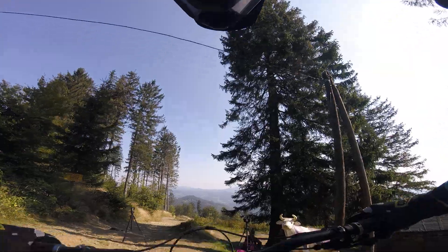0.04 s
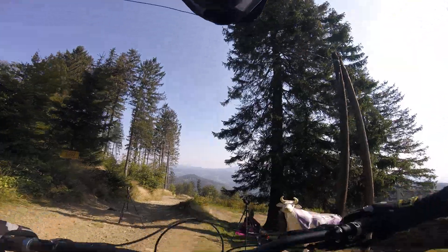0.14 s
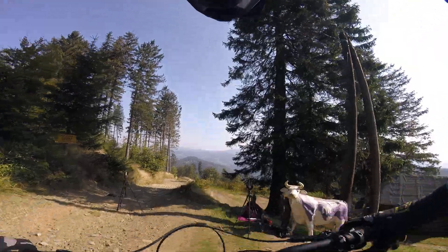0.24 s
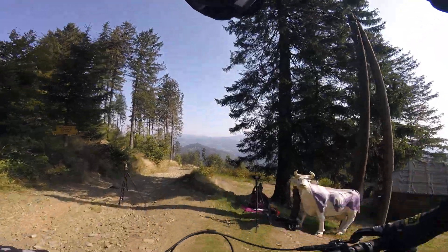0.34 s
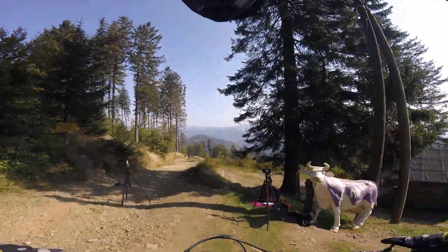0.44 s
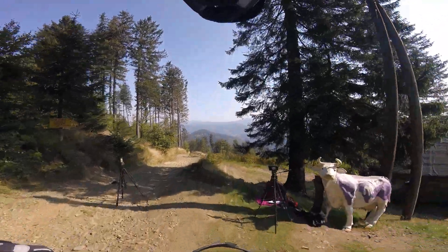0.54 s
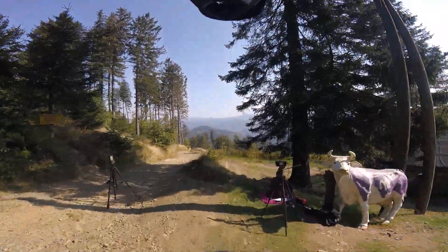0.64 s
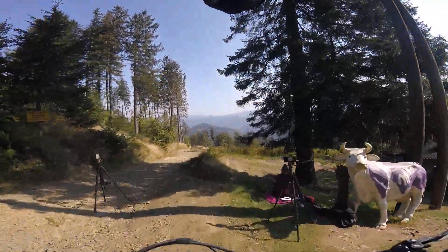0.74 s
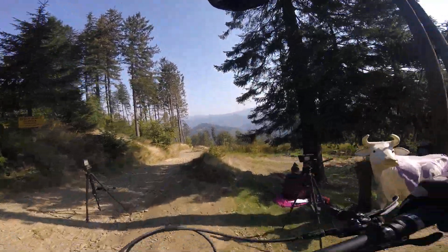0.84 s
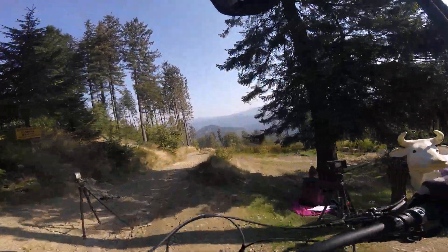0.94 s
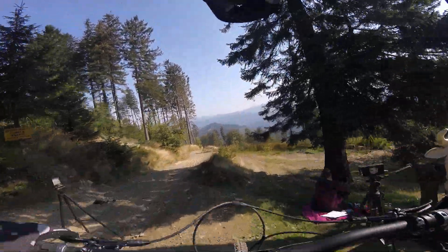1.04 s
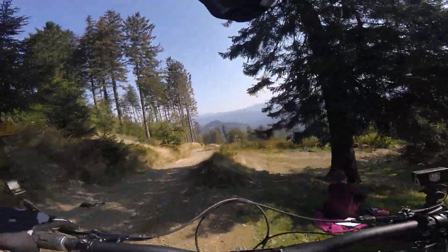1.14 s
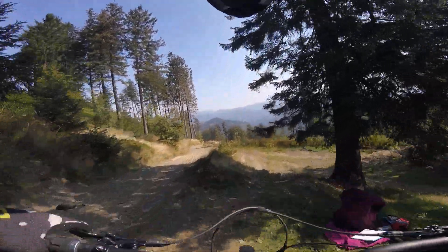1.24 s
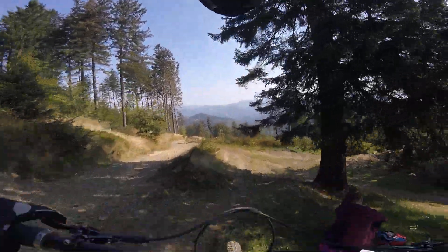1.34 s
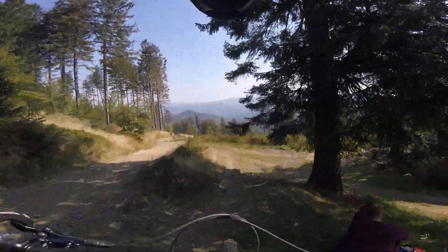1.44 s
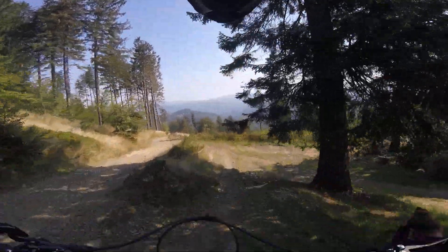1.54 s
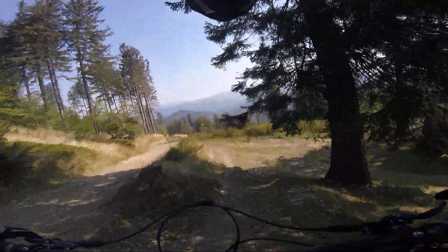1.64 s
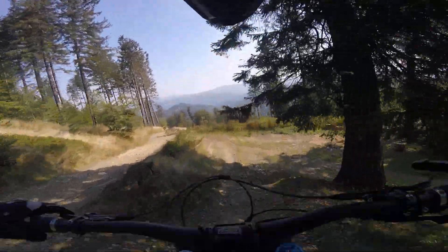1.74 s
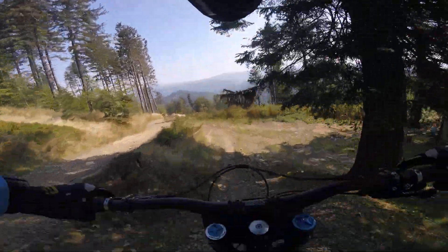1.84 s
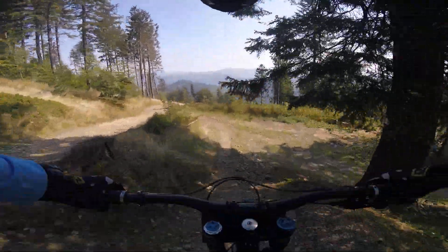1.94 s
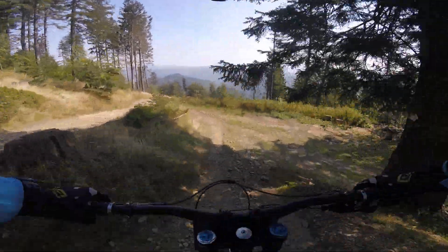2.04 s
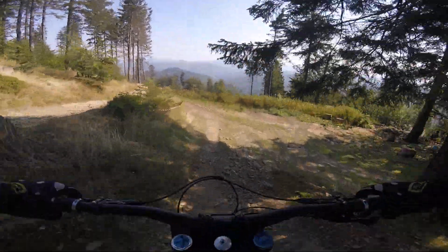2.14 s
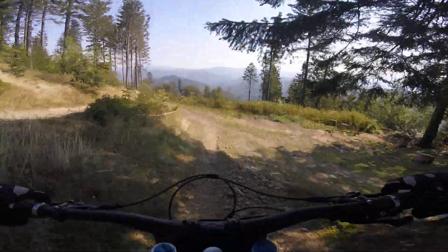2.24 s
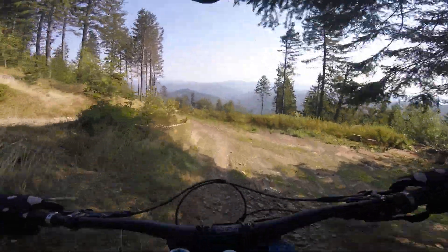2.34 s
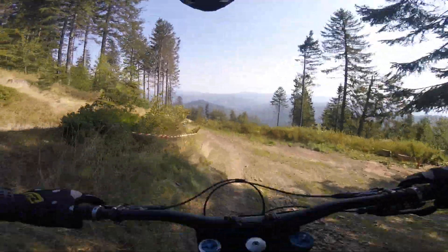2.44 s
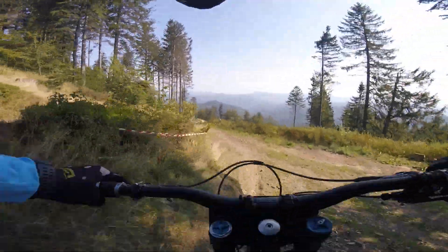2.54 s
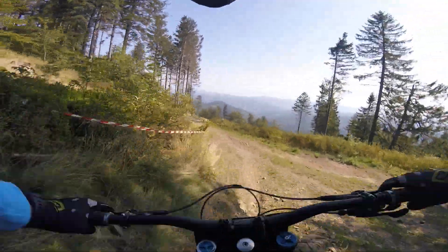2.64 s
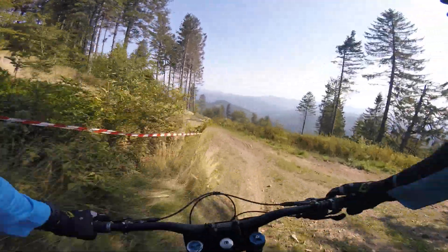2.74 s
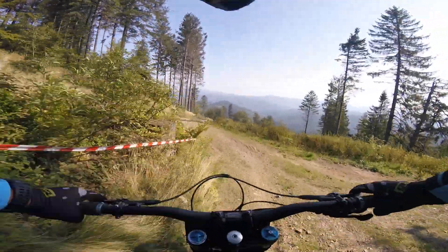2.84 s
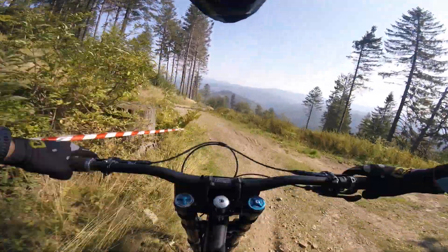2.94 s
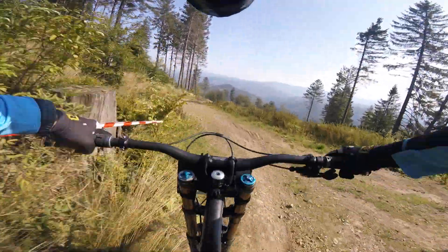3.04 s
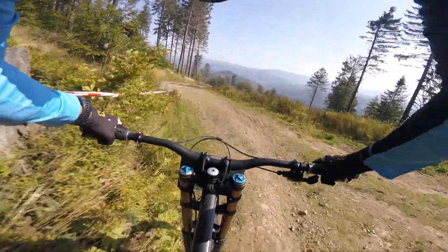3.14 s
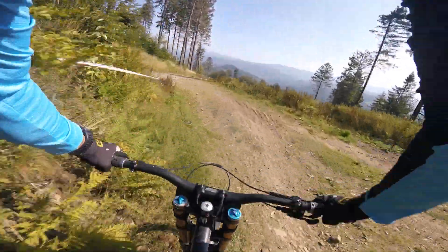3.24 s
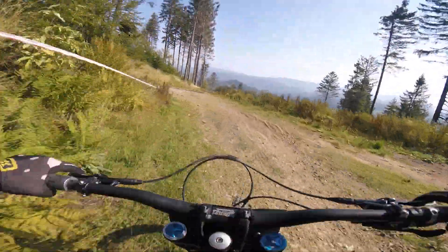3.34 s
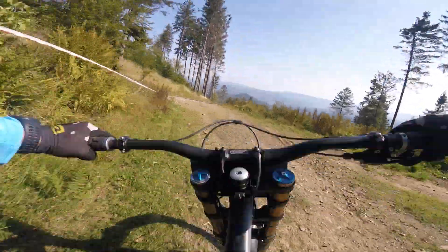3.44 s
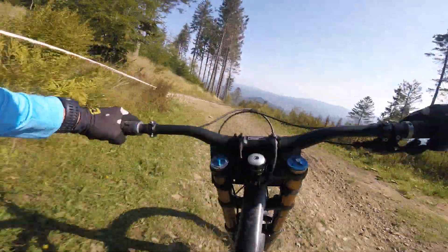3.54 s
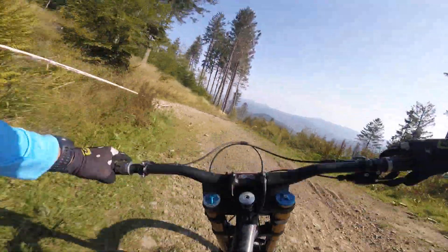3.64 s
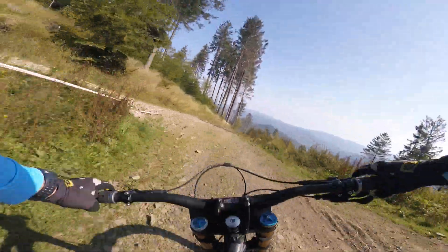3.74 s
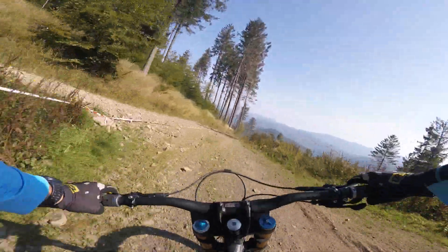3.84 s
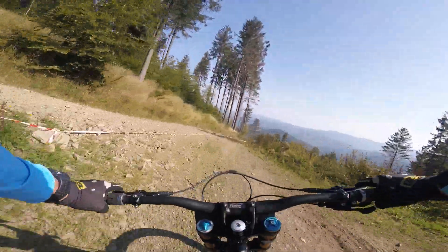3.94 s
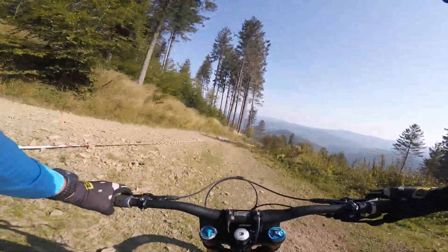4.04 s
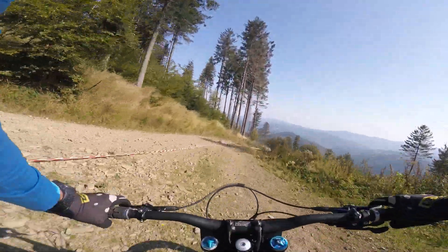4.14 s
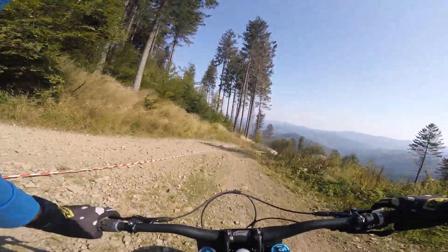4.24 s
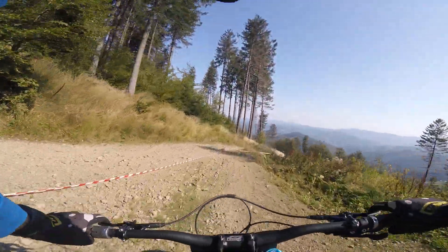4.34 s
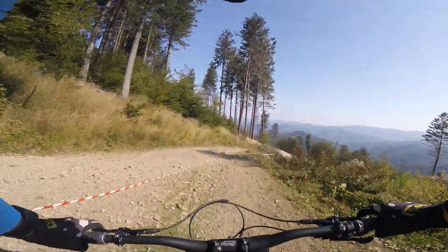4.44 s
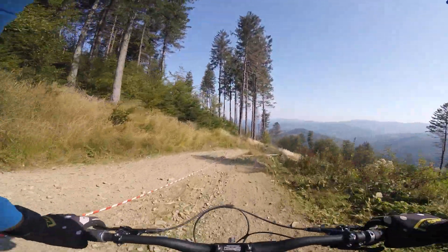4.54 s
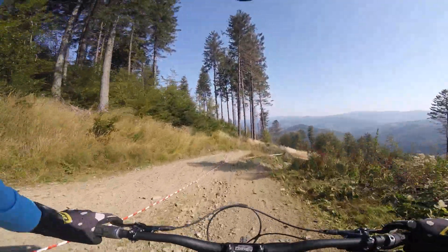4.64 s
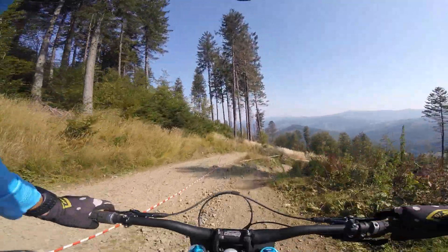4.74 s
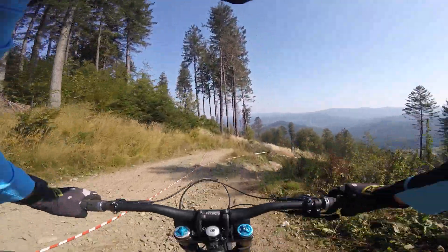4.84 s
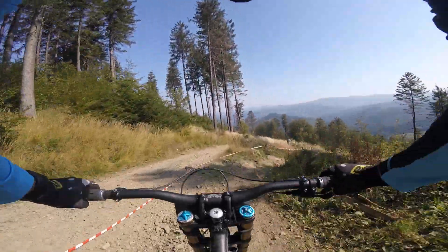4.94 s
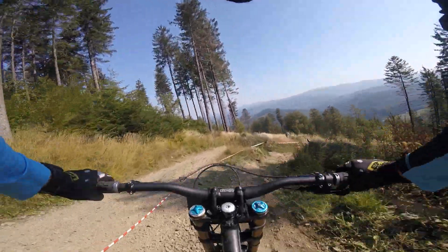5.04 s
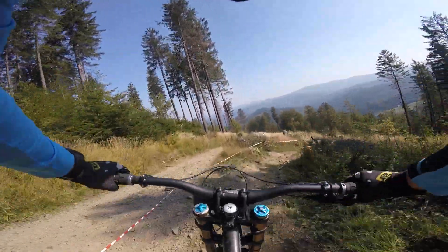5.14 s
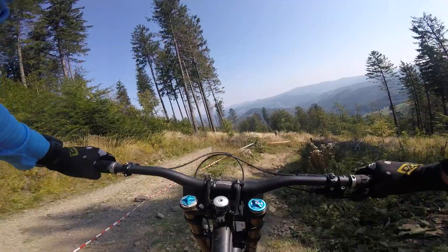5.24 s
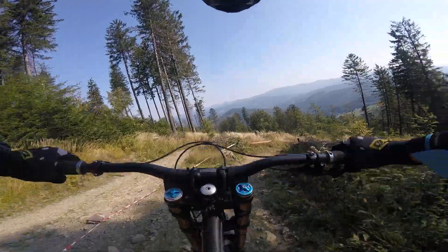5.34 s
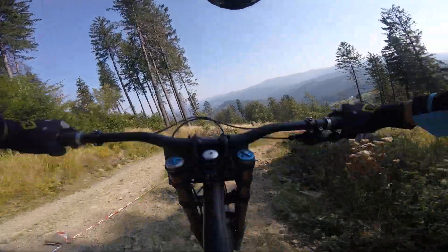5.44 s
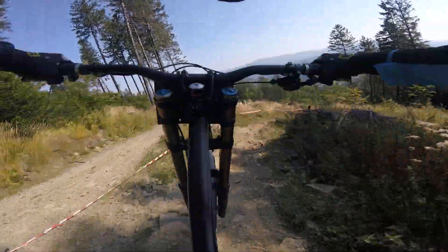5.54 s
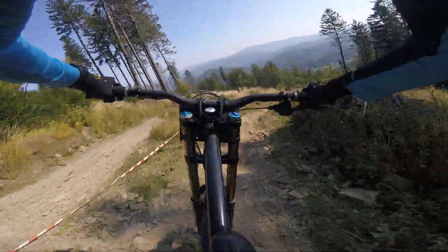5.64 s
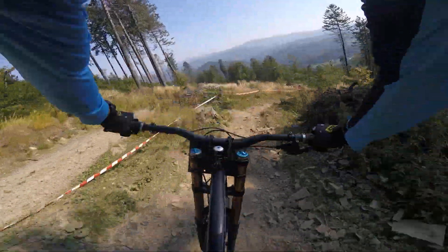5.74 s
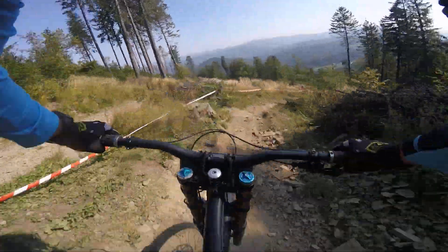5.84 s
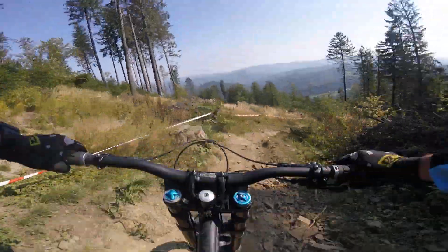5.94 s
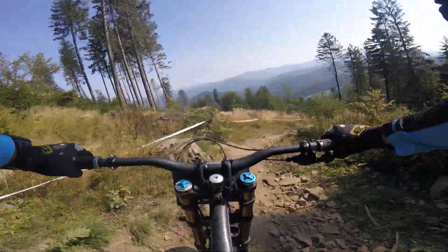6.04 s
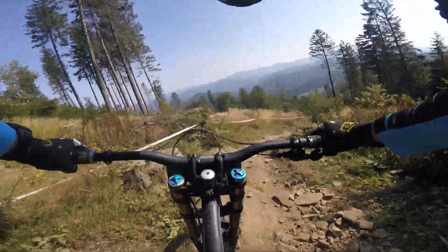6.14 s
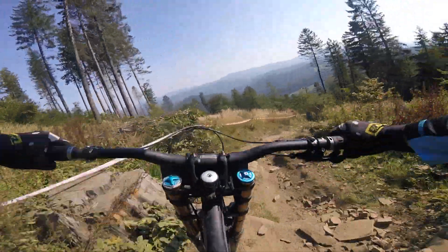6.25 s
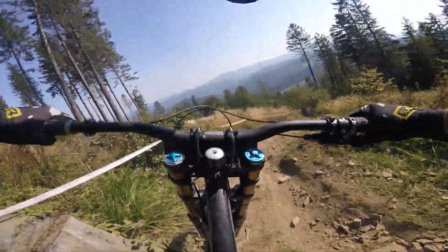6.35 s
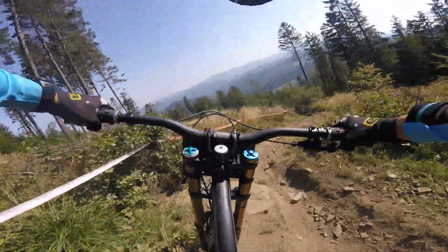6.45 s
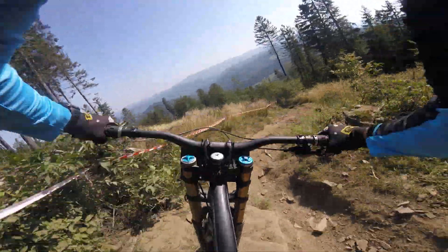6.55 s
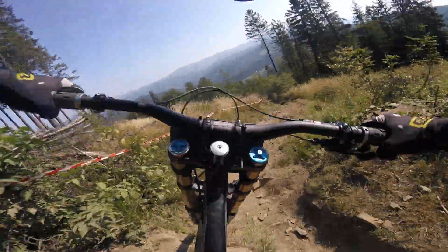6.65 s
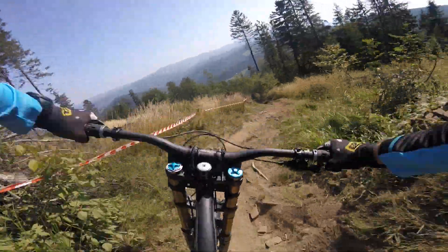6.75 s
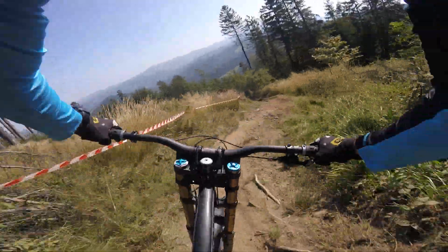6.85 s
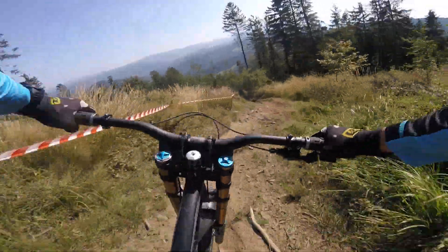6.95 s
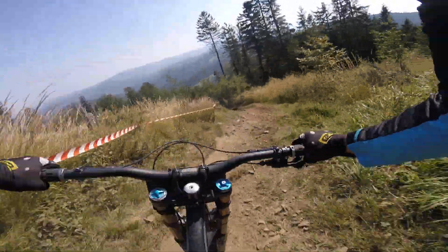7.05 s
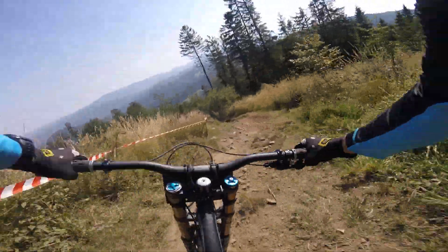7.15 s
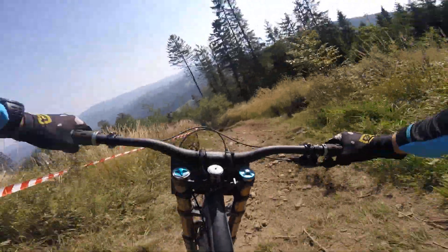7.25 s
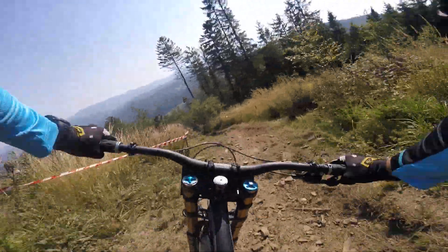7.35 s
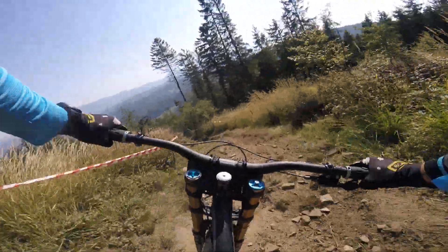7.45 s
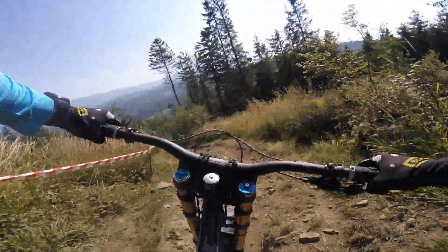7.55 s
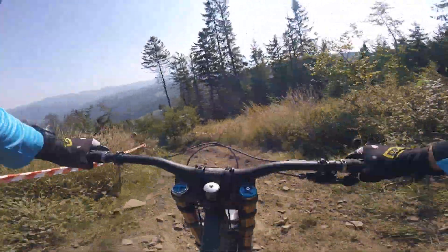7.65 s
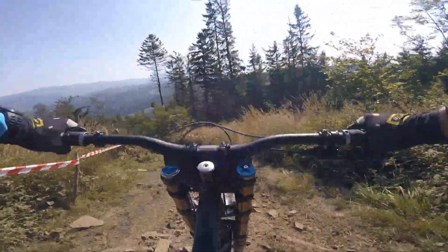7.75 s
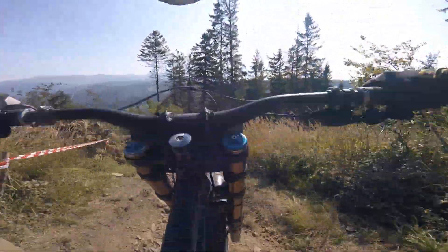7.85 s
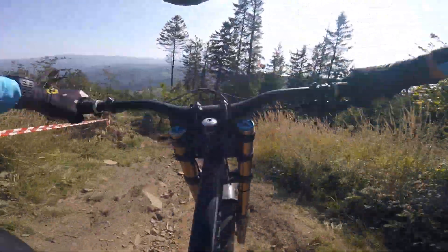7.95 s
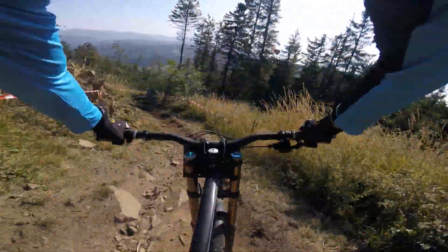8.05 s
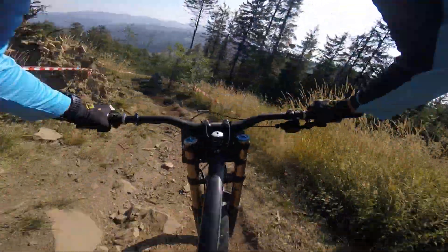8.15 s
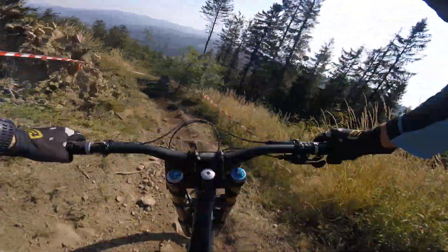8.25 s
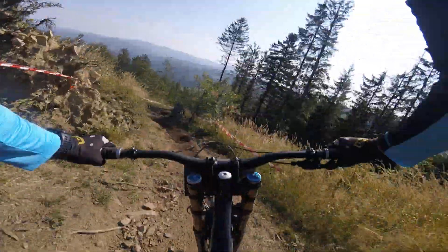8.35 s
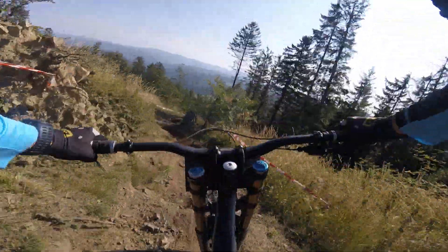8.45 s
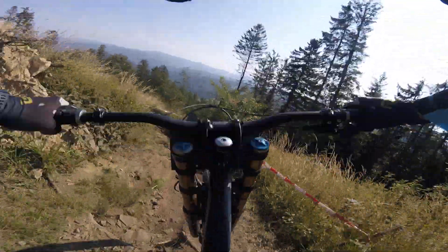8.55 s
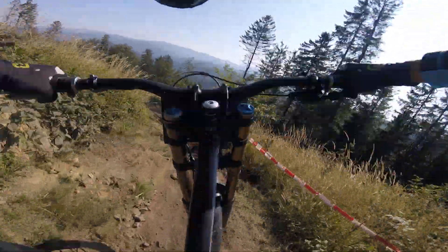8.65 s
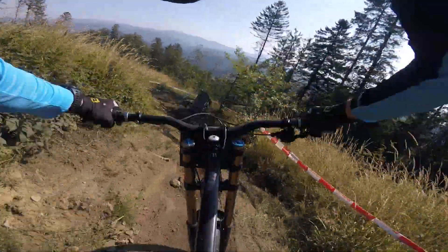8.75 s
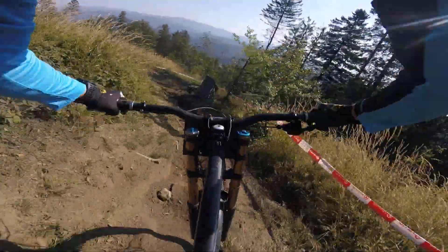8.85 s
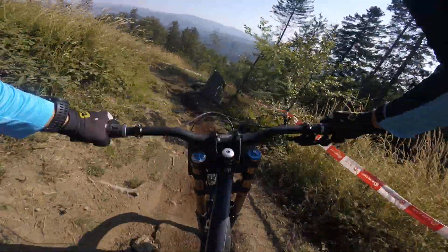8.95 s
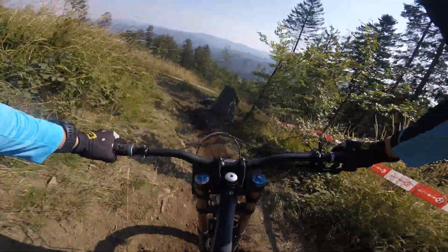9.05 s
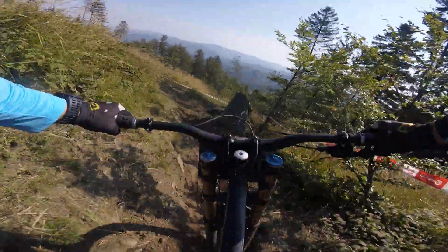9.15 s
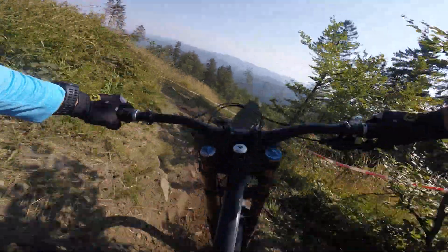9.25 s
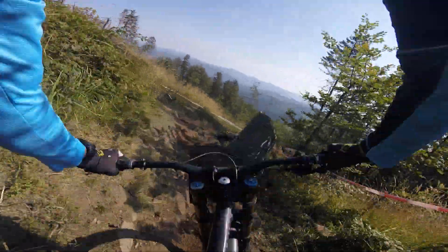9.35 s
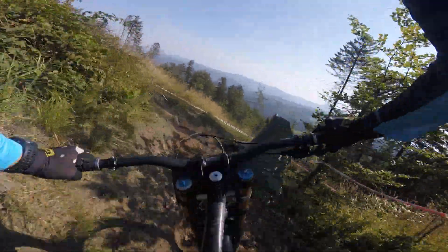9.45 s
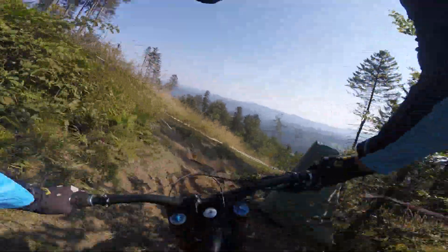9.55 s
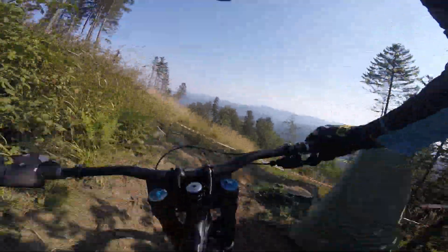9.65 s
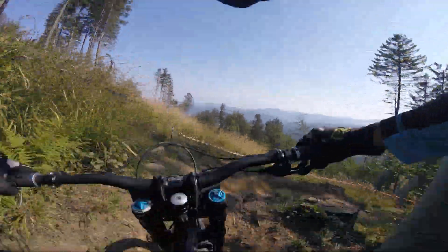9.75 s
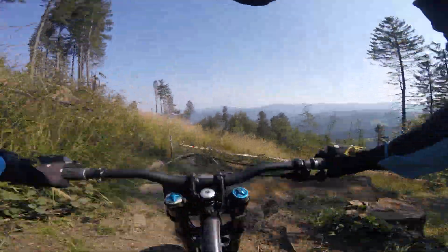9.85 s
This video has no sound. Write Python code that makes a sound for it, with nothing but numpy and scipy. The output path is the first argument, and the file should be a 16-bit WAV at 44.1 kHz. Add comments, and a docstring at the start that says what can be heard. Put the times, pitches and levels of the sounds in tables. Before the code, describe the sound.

A mountain bike sets off on an open hillside, heard close from the rider's chest. From 0 to 0.7 s there are only soft low wind puffs, faint rolling and a hush of air. Around 0.75 s the chain begins to tick; bright hard slaps at 1.02, 1.16 and 1.5 s leave a faint high metallic ringing. From 2 s the tyres crunch over rough patches, with dull jolts and chain slaps thickening to 2.85 s. At 3.1 s comes a heavy thump, the rolling drops out briefly, and another thump lands at 3.25 s. Gravel crunch and smooth hiss follow with fewer knocks, the hiss fading by 5.8 s. A sharp clatter hits at 5.4 s. From 5.8 s to the end, deep wind buffeting dominates, over irregular stone clatter, frame knocks, chain slaps, pebble pings and an intermittent thin wavering brake squeal.

```python
"""A mountain bike rolls off and speeds down a stony trail, heard by a camera on the rider's chest.
First come separate wind puffs (windowed swings) and soft rolling (coloured noise and grit snaps). Then the
chain slaps (rung modes), a few early slaps leave metal singing (narrow noise), frame and pebbles ring.
From 2 s rough patches clatter; near 3.1 s the tyres drop out as the wheels leave the ground, amid hard jolts
(sinking sines). Gravel hiss comes and fades by 5.8 s, while the slow wind buffeting grows; from 6.1 s a brake
sings at times. Air hushes throughout."""
import sys
import numpy as np
from scipy import signal
from scipy.fft import rfft, irfft, next_fast_len
from scipy.io import wavfile
from scipy.ndimage import uniform_filter1d

SR = 44100
rng = np.random.default_rng(int(sys.argv[2]) if len(sys.argv) > 2 else 0)


def transcribe(signal):
    """Save signal, clipped to [-1, 1], as a 16-bit WAV file at the path in sys.argv[1]."""
    frames = np.atleast_2d(signal).T
    limited = np.clip(frames, -1, 1)
    pcm = np.round(limited * 32767).astype(np.int16)
    wavfile.write(sys.argv[1], SR, pcm)


N = 436590


def gain_of(db):
    """Decibels to amplitude."""
    return 10 ** (np.asarray(db) / 20)


def evened(x):
    """Scales to rms 1."""
    return x / np.sqrt(np.mean(x ** 2) + 1e-20)


def follow(rows):
    """Interpolates each column of a time curve at every sample."""
    at_s, *columns = np.transpose(rows)
    t = np.arange(N) / SR
    return [np.interp(t, at_s, column) for column in columns]


def add(mix, start_s, sound):
    """Mixes a sound in at start_s, cut at the end of the mix."""
    part = mix[round(start_s * SR):][:len(sound)]
    part += sound[:len(part)]


def coloured(x, points):
    """Shapes the spectrum of x by (hz, db) points over log frequency, at rms 1."""
    point_hz, point_db = np.transpose(points)
    size = next_fast_len(N)
    hz = np.fft.rfftfreq(size, 1 / SR)
    shape_db = np.interp(np.log(hz + 1), np.log(point_hz + 1), point_db, -90, -90)
    return evened(irfft(rfft(x, size) * gain_of(shape_db), size)[:N])


def lumps(length_s):
    """Random wander of rms 1 whose lumps last about length_s."""
    width = max(round(length_s * SR), 2)
    smoothed = uniform_filter1d(rng.standard_normal(N), width)
    return evened(uniform_filter1d(smoothed, width))


def blotched(x, depth_db):
    """Colours x with random patches a few hundred Hz wide and some tens of ms long, at rms 1."""
    spectra = signal.stft(x, nperseg=512, noverlap=384)[2]
    patches = rng.standard_normal(spectra.T.shape)
    patches = uniform_filter1d(patches, size=9, axis=0)  # over time
    patches = uniform_filter1d(patches, size=3, axis=1)  # over frequency
    spectra = spectra * gain_of(depth_db * evened(patches.T))
    return evened(signal.istft(spectra, nperseg=512, noverlap=384)[1][:N])


def burst(level_db, hz, t60_s, width, rise_s, noise):
    """A short puff of noise from hz / width to hz * width with a quick rise and an even decay."""
    t = np.arange(len(noise)) / SR
    band = [hz / width, min(hz * width, .45 * SR)]
    shape = gain_of(-60 * t / t60_s) * np.minimum(t / rise_s, 1)
    puff = signal.sosfilt(signal.butter(2, band, "band", fs=SR, output="sos"), noise * shape)
    return gain_of(level_db) * puff / abs(puff).max()


def rung(modes, t, weights_db, phases):
    """Modes dying away after one blow, scaled to peak 1 before a quick rise."""
    ring = np.zeros(len(t))
    for (hz, level_db, t60_s), weight_db, phase in zip(modes, weights_db, phases):
        ring += gain_of(level_db + weight_db - 60 * t / t60_s) * np.sin(2 * np.pi * (hz * t + phase))
    return ring / abs(ring).max() * np.minimum(t / 0.00027, 1)


def grit(lo_hz, hi_hz, per_s, spread_db, count=16, ring=1):
    """Small stones snap, each a few cycles at one of count pitches; most are faint, a few large; rms 1."""
    size_db = spread_db * np.minimum(rng.exponential(1, N), 4)
    size = gain_of(size_db) * (rng.random(N) < per_s / SR)
    kind = rng.integers(0, count, N)
    out = np.zeros(N)
    for k, hz in enumerate(np.geomspace(lo_hz, hi_hz, count)):
        turns = np.arange(round(30 * SR / hz)) * hz / SR
        cycles = ring * rng.uniform(2.34, 3.44)
        snap = np.sin(2 * np.pi * turns) * turns * np.exp(-turns / cycles * 2)
        out += signal.oaconvolve(size * (kind == k), snap / np.linalg.norm(snap))[:N]
    return evened(out)


# steady rolling, dropping out while the wheels leave the ground: start_s, crunch_db, fizz_db
ROLL_LEVELS = [(0.0, -49.5, -58), (0.47, -54, -62), (1.0, -44.5, -57.5), (1.8, -41, -51),
               (2.151, -38.5, -50.5), (2.5, -31.5, -44), (2.8, -29, -40), (3.09, -39, -48.5),
               (3.105, -44, -70), (3.14, -46, -62), (3.17, -38, -50), (3.245, -36, -54), (3.26, -43, -65),
               (3.35, -37, -49), (3.7, -34.5, -49), (4.2, -35, -44), (4.62, -31, -43.5), (5.4, -28.5, -42),
               (5.8, -32, -45), (6.6, -33.5, -46.5), (8.1, -32, -46), (9.9, -34, -45)]
# swells at rough patches: peak_s, crunch_db, fizz_db
ROUGH_PATCHES = [(2.02, -36, -45), (2.076, -29.5, -40), (2.24, -33, -42), (2.425, -32, -42),
                 (2.75, -33, -53), (2.82, -28, -48), (2.97, -35, -40), (5.19, -31, -55), (5.27, -41, -57),
                 (5.35, -30, -54), (5.41, -22, -50), (5.46, -28, -53), (5.653, -25, -35.5),
                 (5.848, -24.5, -62), (5.96, -31, -39), (6.18, -29, -52), (6.38, -27, -39),
                 (6.53, -28.5, -40), (6.59, -46, -41), (6.692, -38, -58), (6.88, -32, -42),
                 (7.036, -26.5, -40), (7.19, -25.5, -44), (7.373, -23.5, -34.5), (7.462, -27, -38),
                 (7.545, -25.5, -40), (7.679, -24.5, -36), (7.831, -32, -37), (7.9, -31.5, -41),
                 (8.119, -27, -33.5), (8.27, -26.5, -55), (8.35, -47, -39), (8.53, -44, -59),
                 (8.6, -36, -41), (8.75, -30.5, -40), (8.812, -24.5, -44), (8.86, -38, -34),
                 (9.02, -27.5, -45), (9.151, -26, -34.5), (9.312, -24, -51), (9.38, -29, -40),
                 (9.52, -38, -57), (9.57, -28, -38), (9.77, -29.5, -55.5), (9.89, -49.5, -37.5)]
PATCH_RISE_S, PATCH_FALL_S = 0.024, 0.034  # time to swell by and to fall by 10 dB


def rolling():
    """Amplitudes of crunch and fizz, steady power plus patch swells; third, the crunch swells alone."""
    t = np.arange(0, N, 64) / SR
    at_s, *steady_db = np.transpose(ROLL_LEVELS)
    peak_s, *peak_db = np.transpose(ROUGH_PATCHES)
    late_s = t[:, None] - peak_s
    swell_db = -10 * np.where(late_s < 0, -late_s / PATCH_RISE_S, late_s / PATCH_FALL_S)
    swells = [(gain_of(db + swell_db) ** 2).sum(1) for db in peak_db]
    powers = [gain_of(np.interp(t, at_s, db)) ** 2 + swell for db, swell in zip(steady_db, swells)]
    powers.append(swells[0])
    return [np.interp(np.arange(N) / SR, t, np.sqrt(power)) for power in powers]


# how stony the ground is: start_s, share_0_to_1
STONINESS = [(0, 0.3), (.65, 0.33), (1.0, 0.8), (2.0, 0.86), (2.9, 0.62), (3.4, 0.6), (4.2, 0.47),
             (5.0, 0.57), (5.5, 0.93), (7.0, 0.66), (9.9, 0.82)]
# tyre spectra, crunch, fizz and low shudder of the bike: pitch_hz, level_db (per Hz)
CRUNCH_SPECTRUM = [(250, -26), (480, 3), (700, -6.5), (1050, 0.5), (1550, -3), (1950, 1), (2350, -2),
                   (2800, -8), (3200, -14), (3600, -14), (5000, -23)]
FIZZ_SPECTRUM = [(2000, -51), (3100, 1), (3500, -5.5), (3900, -2.5), (4400, -8.5), (5800, -8.5),
                 (6500, -12), (7100, -12), (7900, -11.5), (9000, -14.5), (10500, -24), (12000, -29.5),
                 (14300, -27), (15500, -41)]
THRUM_SPECTRUM = [(70, -25), (120, -3.5), (200, 6), (350, 1), (550, -19), (900, -25)]
# shudder against the crunch: start_s, level_db
THRUM_LEVELS = [(0, 6), (1.1, 3), (1.8, 6), (3, 7.5), (4, -2.5), (5.5, 1), (8, 2), (9.9, -3)]


def tyres():
    """Rolling noise flutters, shudders low and is sprinkled with snapping grit, more on stony ground."""
    crunch_gain, fizz_gain, _ = rolling()
    stony = np.clip(follow(STONINESS)[0], 0, 1.5)
    ground = stony * lumps(0.0042)
    flicker_db = 3.0 * stony * lumps(0.012)
    crunch = rng.standard_normal(N) * gain_of(4.4 * ground)
    crunch += .5 * stony * grit(487.0, 3340, per_s=900, spread_db=3.0)
    fizz = rng.standard_normal(N) * gain_of(4.5 * ground + flicker_db)
    fizz += 0.51 * stony * grit(3430, 14300, per_s=330, spread_db=0.5)
    thrum = gain_of(follow(THRUM_LEVELS)[0]) * coloured(crunch, THRUM_SPECTRUM)
    crunch = blotched(coloured(crunch, CRUNCH_SPECTRUM), depth_db=2.57)
    fizz = blotched(coloured(fizz, FIZZ_SPECTRUM), depth_db=1.9)
    return crunch_gain * (thrum + crunch) + fizz_gain * fizz


STONES_DB = -9  # against the crunch swells of the rough patches


def stones():
    """Separate larger stones clatter in clusters wherever the ground is rough."""
    clatter = grit(737, 2790, per_s=110, spread_db=4.0, count=24, ring=1.04)
    return gain_of(STONES_DB) * rolling()[2] * clatter


SMOOTH_DB = 25  # how much softer the small blows are on fully smooth ground


def scattered(per_s, over_db, lo_hz, hi_hz):
    """Rows (start_s, level_db, pitch_hz) of small random blows, louder with loud rolling on stony ground."""
    slot = np.arange(int(per_s * N / SR))
    when, size, pitch = rng.random((len(slot), 3)).T
    start_s = (slot + when) / per_s
    at_s, crunch_db, _ = np.transpose(ROLL_LEVELS)
    smooth = 1 - np.interp(start_s, *np.transpose(STONINESS))
    level_db = np.interp(start_s, at_s, crunch_db) + over_db - SMOOTH_DB * smooth
    level_db += 8 * size - 4
    return list(zip(start_s, level_db, lo_hz * (hi_hz / lo_hz) ** pitch))


# chain slaps: start_s, level_db, brightest_hz, jingle_db (against level_db)
CHAIN_SLAPS = [(0.7454, -26.5, 4800, -12), (0.795, -33, 6000, -20), (0.8589, -31, 5460, -14),
               (0.968, -32, 4500, -20), (1.002, -21, 3350, -16), (1.0234, -5, 7000, -13),
               (1.0467, -30, 3300, -30), (1.126, -38, 3200, -30), (1.1575, -9.5, 6800, -12),
               (1.2443, -17.5, 3300, -31), (1.2584, -24, 3300, -28), (1.3349, -21.5, 6900, -25),
               (1.3768, -12.5, 3340, -27), (1.4455, -21, 3600, -30), (1.5087, -6.5, 2830, -31),
               (1.5545, -17, 3400, -14), (1.6743, -24, 5500, -9), (1.5833, -22.5, 3360, -25),
               (1.73, -26, 4820, -25), (1.788, -42, 3300, -25), (1.812, -16.5, 3250, -24),
               (1.84, -23, 3300, -25), (1.896, -25, 5000, -19), (1.977, -32, 7000, -22),
               (2.017, -25, 5200, -25), (2.062, -25, 5000, -25), (2.103, -20, 4000, -25),
               (2.177, -33, 6200, -27), (2.535, -23, 4800, -25), (2.552, -29, 6000, -22),
               (2.387, -23, 5500, -25), (2.234, -19, 3580, -26), (2.339, -12, 5900, -22),
               (2.496, -20, 3670, -25), (2.594, -18, 4030, -21), (2.6683, -14, 3730, -12),
               (2.7278, -11.5, 3880, -24), (2.829, -5.5, 4530, -17), (2.8567, -8, 3500, -36),
               (3.2859, -23.5, 5670, -13), (3.3358, -25, 4170, -14), (3.58, -32, 7000, -20),
               (3.593, -22, 6800, -18), (3.648, -30, 4500, -25), (3.696, -29, 8000, -8),
               (4.505, -18, 3740, -26), (5.3946, -11.5, 3930, -25), (5.4412, -7.5, 3280, -29),
               (5.422, -20, 4500, -25), (5.4612, -7, 3320, -22), (5.732, -31, 3990, -22),
               (5.9623, -28, 3560, -32), (6.006, -14.5, 3550, -15), (6.201, -14.5, 4100, -24),
               (6.581, -22, 5500, -25), (6.775, -28, 5000, -25), (6.873, -29, 4500, -25),
               (7.187, -25, 4500, -25), (7.2394, -12.5, 4150, -27), (7.373, -14, 3360, -25),
               (7.393, -13, 3320, -29), (7.4473, -9, 4290, -20), (7.4644, -10, 3340, -27),
               (7.892, -9.5, 3230, -31), (7.9423, -14.5, 3780, -20), (8.107, -5.5, 3550, -29),
               (8.145, -20, 4540, -38), (8.139, -29, 7500, -20), (8.551, -22, 4000, -27),
               (8.827, -15, 4500, -25), (8.2824, -23, 3570, -31), (8.6045, -4.5, 3360, -44),
               (8.807, -15, 3660, -16), (8.997, -15.5, 3420, -30), (9.1103, -17, 3520, -20),
               (9.162, -19, 3750, -27), (9.3082, -9, 3570, -31), (9.7656, -16, 3570, -42)]
# modes of the links, then of the smallest parts: pitch_hz, level_db, t60_s
LINK_MODES = [(3230, 16.5, 0.0059), (3550, -9, 0.098), (3794, 1, 0.038), (4980, -5, 0.0053),
              (5000, -29, 0.091), (6700, 7, 0.018), (7850, 9, 0.017)]
JINGLE_MODES = [(8670, 2.5, 0.035), (9600, -2.5, 0.042), (10450, 1, 0.005), (12700, 4, 0.0064),
                (14400, -2, 0.02)]
SMALL_SLAPS_PER_S, SMALL_SLAP_DB = 3.5, 7  # level above the steady crunch
SLAP_T60_S, TICK_DB, TICK_T60_S = 0.022, -12.5, 0.012
RATTLE_DB, RATTLE_T60_S, RATTLE_PER_S = -24, 0.025, 670  # loose links chatter on after a slap


def chain():
    """Each slap ticks, rings the links nearest its own brightness and jingles the smallest parts."""
    out, t = np.zeros(N), np.arange(5000) / SR
    link_hz = np.transpose(LINK_MODES)[0]
    small = [(*row, -26) for row in scattered(SMALL_SLAPS_PER_S, SMALL_SLAP_DB, 2500, 3400)]
    for start_s, level_db, hz, jingle_db in CHAIN_SLAPS + small:
        noise = rng.standard_normal(len(t))
        near_db = 1.4 * rng.random(len(link_hz)) - 9.7 * abs(np.log2(link_hz / hz))
        links = gain_of(level_db - 5.5) * rung(LINK_MODES, t, near_db, rng.random(len(link_hz)))
        part_db, part_phase = rng.random((2, len(JINGLE_MODES)))
        jingle = gain_of(level_db + jingle_db) * rung(JINGLE_MODES, t, 38.0 * part_db - 4.5, part_phase)
        slap = burst(level_db - 12.0, hz, SLAP_T60_S, width=1.35, rise_s=0.0014, noise=noise)
        tick = burst(level_db + TICK_DB, 4000, TICK_T60_S, width=1.4, rise_s=0.00088, noise=noise[::-1])
        hits = 1. * (rng.random(len(t)) < RATTLE_PER_S / SR)
        chatter = 0.38 + uniform_filter1d(hits, size=40) * 40
        loose = rng.standard_normal(len(t)) * chatter
        rattle = burst(level_db + RATTLE_DB, hz, RATTLE_T60_S, width=1.1, rise_s=0.0087, noise=loose)
        add(out, start_s, links + jingle + slap + tick)
        add(out, start_s + 0.0042, rattle)
    return out


# metal left singing by a few early slaps: start_s, pitch_hz, width_hz, level_db, t60_s
SINGING_METAL = [(1.024, 9450, 380, -59.5, 1.2), (1.024, 6600, 400, -61, 2), (1.024, 7500, 250, -64, 1),
                 (1.157, 9250, 150, -61, .5), (1.157, 7550, 200, -63, .6), (1.245, 6570, 250, -62, 2),
                 (1.51, 6600, 250, -64, 1.5)]


def singing():
    """Narrow noise bands make fuzzy high rings that flutter and fade slowly."""
    out, t = np.zeros(N), np.arange(SR) / SR
    for start_s, hz, width_hz, level_db, t60_s in SINGING_METAL:
        edges_hz = [hz - width_hz / 2, hz + width_hz / 2]
        band = signal.butter(2, edges_hz, "band", fs=SR, output="sos")
        ring = evened(signal.sosfilt(band, rng.standard_normal(SR)))
        add(out, start_s, gain_of(level_db - 60 * t / t60_s) * ring)
    return out * gain_of(3.0 * lumps(.015))


# frame knocks: start_s, level_db, pitch_hz, t60_s (of the ring)
FRAME_KNOCKS = [(0.39, -48, 2500, .02), (0.59, -47, 2420, .02), (0.745, -34.5, 1110, 0.059),
                (1.002, -32, 1780, 0.064), (1.02, -30, 2670, 0.028), (1.045, -31, 1490, 0.022),
                (1.154, -33, 2350, 0.019), (1.244, -22, 1490, 0.035), (1.356, -29, 1170, 0.056),
                (1.374, -19.5, 1770, 0.023), (1.445, -31, 1180, 0.041), (1.676, -25.5, 1300, 0.022),
                (1.811, -27.5, 1780, 0.03), (2.059, -23, 1110, 0.046), (2.07, -19.5, 1820, 0.037),
                (2.103, -24, 1880, 0.05), (2.081, -37, 1700, .04), (2.397, -23.5, 2150, 0.055),
                (2.412, -27.5, 2250, 0.054), (2.427, -35, 2120, 0.036), (2.44, -26, 1100, 0.026),
                (2.735, -23, 1100, 0.034), (2.945, -25, 1530, 0.018), (2.669, -22, 950, 0.12),
                (2.812, -20.5, 955, 0.089), (2.856, -20.5, 1930, 0.023), (3.007, -23.5, 1935, 0.051),
                (3.097, -28, 1300, .025), (3.117, -32, 1220, .03), (3.249, -44, 990, 0.023),
                (3.26, -24.5, 1410, 0.026), (3.524, -31, 2230, 0.04), (3.559, -31, 2130, 0.063),
                (3.614, -35, 2580, .03), (3.7, -31.5, 1900, .05), (3.743, -32, 2490, .03),
                (3.657, -15, 1260, 0.02), (3.855, -17.5, 925, 0.017), (5.174, -19, 950, .03),
                (5.257, -21.5, 1096, 0.11), (5.378, -24, 630, 0.022), (5.395, -23, 1180, 0.083),
                (5.691, -17, 1410, 0.045), (5.838, -16.5, 1800, 0.03), (5.8408, -14, 900, 0.036),
                (5.842, -36, 2240, 0.022), (5.8453, -20, 1490, .025), (5.849, -23, 1490, 0.022),
                (5.856, -41, 1900, 0.014), (5.909, -23, 1570, 0.037), (5.937, -21, 900, .04),
                (5.993, -23, 1330, 0.041), (5.531, -21, 1000, 0.016), (7.01, -28, 1850, 0.038),
                (8.521, -32, 1650, .03), (8.993, -22, 826, 0.023), (9.268, -21, 870, 0.024),
                (9.521, -28, 1860, 0.041), (9.748, -25, 1290, .03), (6.17, -30, 960, 0.12),
                (6.359, -18, 1230, 0.022), (6.384, -21, 1950, .04), (6.41, -23, 2200, 0.037),
                (6.581, -23, 1930, 0.023), (6.85, -25, 1300, 0.033), (6.891, -22.5, 1290, .05),
                (7.06, -18.5, 1330, 0.028), (7.19, -34, 1500, .03), (6.672, -17.5, 1350, 0.021),
                (7.249, -14.5, 745, 0.02), (7.348, -22.5, 980, .05), (7.39, -35, 620, 0.034),
                (7.428, -24, 940, 0.027), (7.446, -20.5, 1654, 0.088), (7.666, -18.5, 1280, 0.04),
                (7.807, -14.5, 934, 0.04), (7.585, -20.5, 1680, .03), (7.845, -23.5, 1800, .03),
                (7.893, -16.5, 1170, 0.014), (8.107, -20.5, 1310, 0.068), (8.256, -23.5, 1850, 0.047),
                (8.305, -14.5, 1980, 0.02), (8.534, -16, 965, .03), (8.605, -11.5, 1500, 0.023),
                (8.726, -25, 1910, 0.097), (8.072, -21.5, 800, 0.038), (8.345, -23, 1310, 0.037),
                (8.705, -32, 2000, .03), (8.769, -23.5, 2130, 0.029), (8.793, -18, 1250, 0.036),
                (8.812, -22, 1390, 0.043), (8.86, -20, 1310, 0.032), (8.831, -21, 1320, 0.046),
                (9.15, -21, 1470, 0.1), (9.299, -15.5, 990, 0.038), (9.477, -17, 830, 0.019),
                (9.818, -19.5, 1720, 0.032)]
SMALL_KNOCKS_PER_S, SMALL_KNOCK_DB, SMALL_KNOCK_T60_S = 3, 8, 0.018  # level above the steady crunch


def frame():
    """Knocks of tubes, cables and fork: a wide snap and a short pitched ring in a dull puff."""
    out, t = np.zeros(N), np.arange(5000) / SR
    scatter = scattered(SMALL_KNOCKS_PER_S, SMALL_KNOCK_DB, 895, 2120)
    small = [(*row, SMALL_KNOCK_T60_S) for row in scatter]
    for start_s, level_db, hz, t60_s in FRAME_KNOCKS + small:
        puff_noise, snap_noise = rng.standard_normal((2, len(t)))
        fade = gain_of(level_db + 1.5 - 60 * t / t60_s) * np.minimum(t / 0.00037, 1)
        ring = fade * np.sin(2 * np.pi * hz * t)
        puff = burst(level_db + 2.5, hz, 1.9 * t60_s, width=1.56, rise_s=0.0006, noise=puff_noise)
        snap = burst(level_db - 8.0, hz, 0.011, width=2.24, rise_s=0.00018, noise=snap_noise)
        add(out, start_s, ring + puff + snap)
    return out


# jolts through the camera mount: start_s, level_db, settled_hz
MOUNT_JOLTS = [(0.186, -24.5, 330), (.499, -39, 600), (.674, -28, 290), (1.246, -14.5, 210),
               (1.937, -18, 212), (2.056, -8.5, 211), (2.207, -14, 268), (2.45, -22, 207),
               (2.513, -6.5, 295), (2.627, -6, 193), (2.739, -10, 420), (2.805, -2, 232), (3.009, -33, 207),
               (3.077, -7, 130), (3.084, 0, 147), (3.091, 2, 168), (3.088, -22, 486), (3.095, 1.5, 171),
               (3.097, -15, 420), (3.16, -26, 500), (3.118, -11.5, 294), (3.167, -16, 252),
               (3.2387, 4, 126), (3.249, -1, 411), (3.2527, -0.5, 104), (3.638, -6, 99), (3.655, -1, 185),
               (3.853, -14, 230), (4.189, -26, 201), (4.313, -7, 164), (4.847, -8, 220), (5.17, -12, 230),
               (5.334, -13, 220), (5.376, -8.5, 357), (5.739, -6, 214), (5.8385, -4, 292), (5.845, -5, 290),
               (6.743, -14, 244), (7.178, -9.5, 220), (7.249, -2, 215), (7.256, -11, 335), (7.306, -5, 225),
               (6.199, -7, 169), (6.541, -12, 252), (6.635, -11, 199), (6.684, -13, 200),
               (7.001, -12.5, 238), (8.098, -10, 276), (8.22, -15, 190), (9.111, -16, 249),
               (7.804, -6.5, 243), (7.815, -16, 330), (8.279, -12, 220), (8.83, -11.5, 300),
               (8.07, -21, 460), (8.349, -15, 330), (8.601, -14, 302), (8.789, -14, 334), (9.323, -19, 530),
               (9.47, -11.5, 206)]
JOLT_T60_S = 0.054
JOLT_DROP, JOLT_DROP_S = 0.98, 0.002  # starts sharp by this share, settles with this time constant
BODY_DB, BODY_SHARE = -9.5, 0.496  # heavier swing: level and pitch against the jolt


def mount():
    """A jolt swings the camera a few cycles that sink in pitch, over a heavier swing, with a rough edge."""
    out, t = np.zeros(N), np.arange(6000) / SR
    sagging_s = t + JOLT_DROP * JOLT_DROP_S * (1 - np.exp(-t / JOLT_DROP_S))
    for start_s, level_db, hz in MOUNT_JOLTS:
        fade = gain_of(level_db - 60 * t / JOLT_T60_S)
        swing = fade * np.sin(2 * np.pi * hz * sagging_s) * np.minimum(t / 0.0011, 1)
        body = gain_of(BODY_DB) * fade * np.sin(2 * np.pi * BODY_SHARE * hz * t)
        noise = rng.standard_normal(len(t))
        edge = burst(level_db - 6.5, 1.28 * hz, 0.23 * JOLT_T60_S, width=1.7, rise_s=0.012, noise=noise)
        add(out, start_s, swing + body + edge)
    return out


# pebbles pinging off spokes and tubes: start_s, level_db, pitch_hz, t60_s
PEBBLE_PINGS = [(.82, -35, 1270, .05), (.873, -37, 1800, .04), (5.635, -22, 2200, .03),
                (8.178, -38, 3800, .04), (8.304, -22, 3110, .04), (1.488, -46, 3560, .03),
                (1.498, -29, 3600, 0.045), (1.509, -16, 3120, 0.024), (1.549, -36, 3220, .04),
                (1.377, -30, 3130, 0.03), (1.245, -36, 5000, 0.037), (5.164, -32, 3800, .02),
                (5.409, -13, 1880, 0.029), (5.422, -22, 1290, .025), (5.441, -14.5, 3600, 0.023),
                (6.6, -31, 4100, 0.068), (6.691, -21, 1850, .04), (6.775, -26, 3120, .02),
                (6.787, -25, 2470, .04), (6.808, -28, 2080, .05), (6.873, -25, 2620, .025),
                (7.187, -24, 2000, .02), (7.366, -24, 1980, .03), (8.095, -18, 2180, .02),
                (8.107, -17, 3550, .025), (8.113, -21, 1410, .025), (8.139, -30, 4900, .015),
                (8.145, -16, 4800, 0.015), (8.151, -21, 2080, .03), (8.577, -26, 1880, .04),
                (8.599, -13, 2050, .02), (8.806, -29, 3600, 0.091)]
PING_RISE_S = 0.0007


def pings():
    """Each pebble leaves one short clean decaying sine."""
    out, t = np.zeros(N), np.arange(5000) / SR
    for start_s, level_db, hz, t60_s in PEBBLE_PINGS:
        fade = gain_of(level_db - 60 * t / t60_s) * np.minimum(t / PING_RISE_S, 1)
        add(out, start_s, fade * np.sin(2 * np.pi * hz * t))
    return out


# light braking: start_s, length_s, level_db
BRAKING = [(6.1, .3, -52), (7.3, .75, -50), (8.95, .5, -49), (9.6, .4, -50)]
BRAKE_HZ, BRAKE_FADE_S = 2631, .05


def brake():
    """A thin squeal of the disc, wavering in pitch and level, while the lever is held."""
    t, held = np.arange(N) / SR, np.zeros(N)
    for start_s, length_s, level_db in BRAKING:
        inside_s = np.minimum(t - start_s, start_s + length_s - t)
        held += gain_of(level_db) * np.clip(inside_s / BRAKE_FADE_S, 0, 1)
    turns = np.cumsum(BRAKE_HZ + 8.6 * lumps(0.018)) / SR
    return held * gain_of(6.3 * lumps(0.026)) * np.sqrt(2) * np.sin(2 * np.pi * turns)


# hiss spectrum: pitch_hz, level_db (per Hz)
HISS_SPECTRUM = [(4500, -26), (5300, 11), (6100, -21), (8700, -3), (10400, 5), (11500, -9), (14600, -5),
                 (15500, -25)]
# hiss over time: start_s, level_db
HISS_LEVELS = [(0, -73), (2.2, -74), (2.8, -58), (3.09, -59), (3.11, -72), (3.2, -62), (3.5, -61),
               (4.2, -58), (5.0, -56), (5.65, -72), (5.8, -87), (9.9, -95)]


def hiss():
    """Smooth bright hiss of the tread over fine gravel, from coloured noise."""
    return gain_of(follow(HISS_LEVELS)[0]) * coloured(rng.standard_normal(N), HISS_SPECTRUM)


# wind before gusts, surges and lulls: start_s, buffet_db (slow swings), eddies_db (quicker)
WIND_LEVELS = [(0, -35.5, -35.5), (.5, -32.5, -35), (.82, -20.5, -29.5), (1.05, -26, -36),
               (1.3, -21.5, -26), (1.4, -17.5, -23.5), (1.7, -16.5, -19.5), (2.3, -19, -15.5),
               (2.9, -14.5, -14), (3.1, -21, -13.5), (3.2, -15, -22.5), (3.65, -19.5, -17),
               (4.3, -12.5, -13.5), (4.75, -11.5, -14.5), (5.15, -6.5, -13.5), (5.5, -11.5, -12),
               (5.85, -4.5, -18.5), (6.25, -8, -20), (6.7, -8.5, -16.5), (7.3, -8, -16), (7.7, -8.5, -19.5),
               (8.25, -5, -20), (8.6, -12.5, -21), (8.86, -2, -20.5), (8.94, -15, -28), (9.15, -5, -26.5),
               (9.5, -6.5, -24), (9.9, -6.5, -25.5)]
# brief surges and lulls of the eddies: centre_s, change_db, length_s
EDDY_CHANGES = [(1.39, -0.5, 0.029), (1.612, 12, 0.018), (1.75, 5, 0.035), (1.98, 6, 0.062),
                (2.217, 7.5, 0.032), (2.33, -1.5, 0.032), (2.377, 3, 0.027), (2.97, 1, 0.027),
                (3.337, 7.5, 0.022), (3.665, 7.5, 0.014), (3.704, -8, 0.019), (4.347, 4, 0.067),
                (4.522, -3, 0.022), (4.742, -1, 0.019), (5.038, 7, 0.016), (7.27, 4, 0.046),
                (8.09, 5, 0.041), (8.31, 7.5, 0.056), (8.45, -1, 0.044), (8.795, 5, 0.11)]
# eddy power in large deep eddies: start_s, share_0_to_1
DEEP_SHARE = [(0, 0.8), (.9, 0.81), (1.4, 0.96), (2.2, 0.78), (3.1, 0.78), (4.1, 0.68), (5, 0.52),
              (6, 0.55), (7.2, 0.74), (8.5, 0.55), (9.2, 0.06), (9.9, 0.6)]
# wind spectra, buffeting, large and small eddies: pitch_hz, level_db (per Hz)
BUFFET_SPECTRUM = [(4.7, -37), (8.0, 1.5), (22, 11.5), (40, 7.5), (91, -19.5), (120, -46), (160, -53),
                   (260, -120)]
LARGE_EDDY_SPECTRUM = [(35, -11), (60, 1.5), (110, -10), (160, -11), (230, -54), (400, -68)]
SMALL_EDDY_SPECTRUM = [(50, -23.5), (100, 3.5), (150, -2.5), (200, -2.5), (300, -11.5), (480, -20),
                       (700, -30.5), (1500, -40.5)]
GUST_S, BUFFET_GUST_DB, EDDY_GUST_DB = 0.082, 1, 2.5  # random gusts: length and depth
MEMBRANE_REACH = .55  # largest buffet swing


def wind():
    """Large slow pressure swings that flatten at the membrane, and lumpy smaller eddies."""
    t = np.arange(N) / SR
    buffet_db, eddies_db = follow(WIND_LEVELS)
    buffet_db = buffet_db + BUFFET_GUST_DB * lumps(GUST_S)
    eddies_db = eddies_db + EDDY_GUST_DB * np.minimum(lumps(GUST_S), 1.5)
    for centre_s, change_db, length_s in EDDY_CHANGES:
        eddies_db += change_db * np.exp(-((t - centre_s) / length_s) ** 2)
    push = gain_of(buffet_db) * coloured(rng.standard_normal(N), BUFFET_SPECTRUM)
    buffet = MEMBRANE_REACH * np.tanh(push / MEMBRANE_REACH)
    deep = np.clip(follow(DEEP_SHARE)[0], 0, 1)
    large = coloured(rng.standard_normal(N), LARGE_EDDY_SPECTRUM)
    small = coloured(rng.standard_normal(N) * gain_of(3.7 * lumps(0.016)), SMALL_EDDY_SPECTRUM)
    return buffet + gain_of(eddies_db) * (np.sqrt(deep) * large + np.sqrt(1 - deep) * small)


# separate puffs of wind while the bike is still slow: peak_s, level_db, swing_hz
WIND_PUFFS = [(.042, -17, 45), (.2, -26, 60), (.295, -16, 45), (0.424, -14, 37.4), (.535, -19, 40),
              (.74, -19, 35), (0.816, -15, 45), (1.21, -18.5, 60), (1.384, -12, 45), (1.62, -5.5, 49.6),
              (1.76, -7, 60), (1.911, -16, 70)]
PUFF_TURNS = 0.57  # half the length of a puff, in swings


def puffs():
    """A puff pushes the membrane to and fro once or twice: a cosine in a bell-shaped window."""
    t, out = np.arange(3 * SR) / SR, np.zeros(N)
    for peak_s, level_db, hz in WIND_PUFFS:
        turns = hz * (t - peak_s)
        swell = gain_of(level_db) * np.exp(-(turns / PUFF_TURNS) ** 2)
        add(out, 0, swell * np.cos(2 * np.pi * (turns + rng.random())))
    return out


# open hillside spectrum: pitch_hz, level_db (per Hz)
AIR_SPECTRUM = [(180, -12), (300, 0.5), (439, -5), (517, -8), (794, -6.5), (4280, -28), (8560, -25.5),
                (11700, -39.5), (13500, -46), (15500, -80)]
AIR_DB = -48.5


def air():
    """The faint smooth hush of the hillside, from coloured noise."""
    return gain_of(AIR_DB) * coloured(rng.standard_normal(N), AIR_SPECTRUM)


def scene():
    """Everything reaches one microphone in the open air."""
    ground = tyres() + stones() + hiss()
    bike = chain() + singing() + frame() + mount() + pings() + brake()
    weather = wind() + puffs() + air()
    return (ground + bike + weather)[None]


EDGE_HZ = 15350


def record(dry):
    """Peaks round off near full scale; then a low-pass limits the band."""
    rounded = 0.98 * np.tanh(dry / 1.178)
    lowpass = signal.firwin(511, EDGE_HZ, window=("kaiser", 9), fs=SR)
    return signal.oaconvolve(rounded, lowpass[None], "same")


dry = scene()
out = record(dry)
transcribe(out)
```